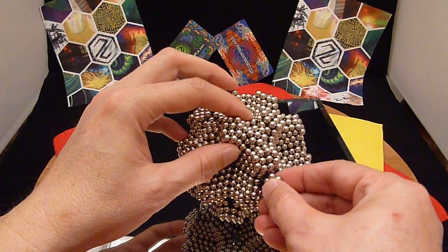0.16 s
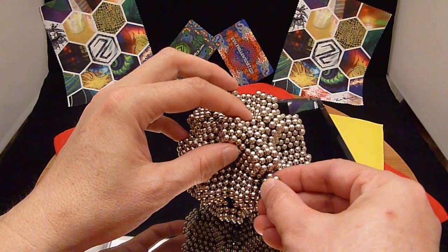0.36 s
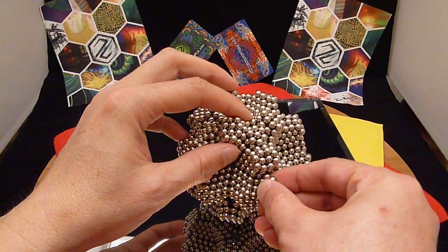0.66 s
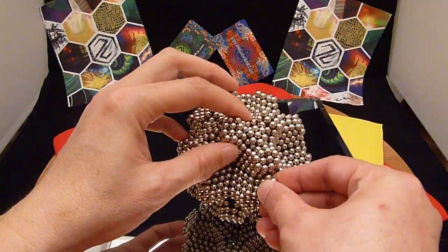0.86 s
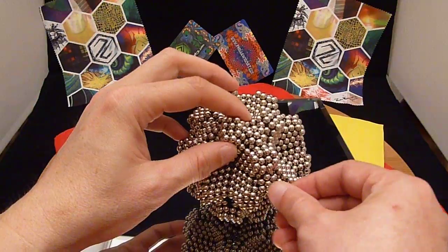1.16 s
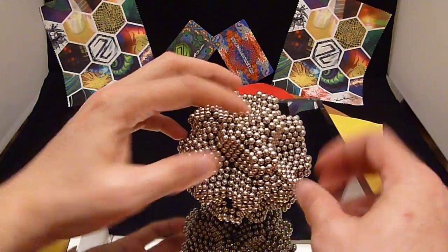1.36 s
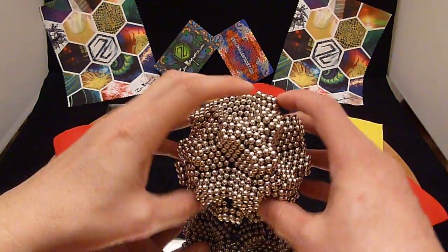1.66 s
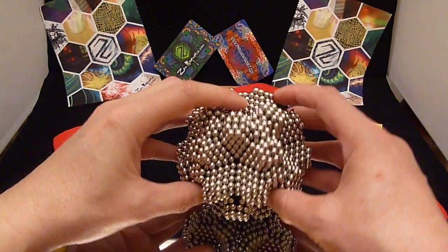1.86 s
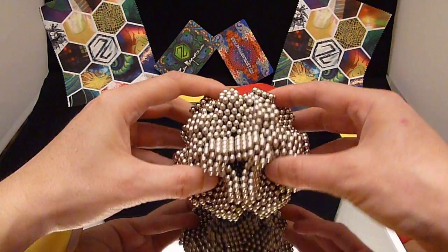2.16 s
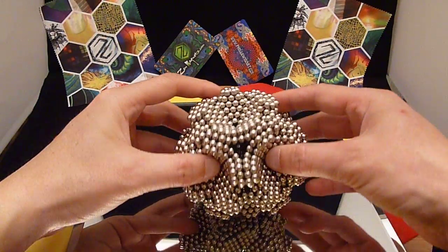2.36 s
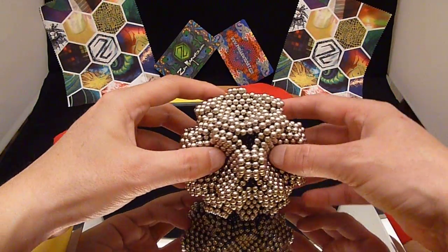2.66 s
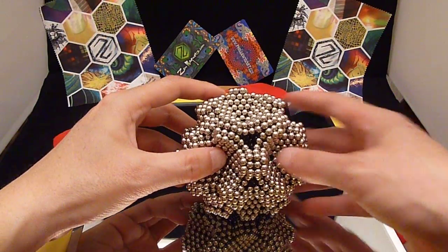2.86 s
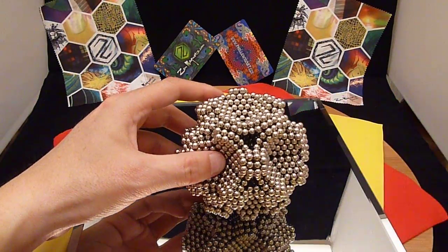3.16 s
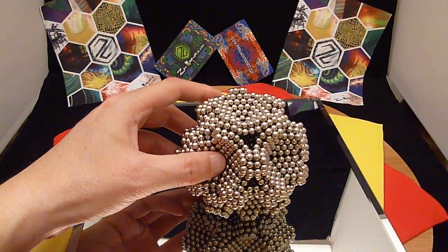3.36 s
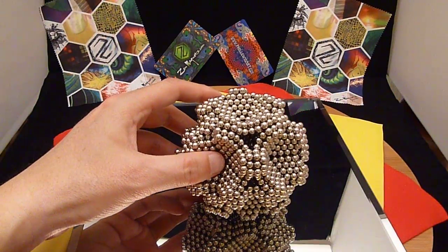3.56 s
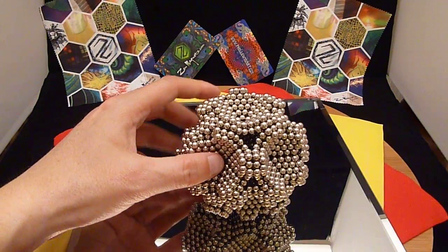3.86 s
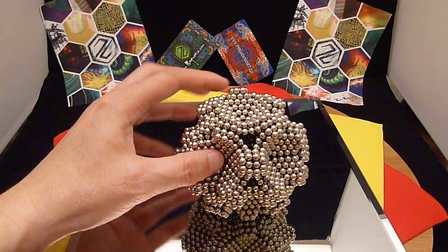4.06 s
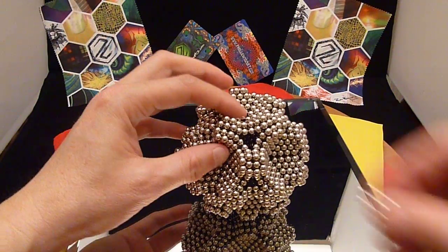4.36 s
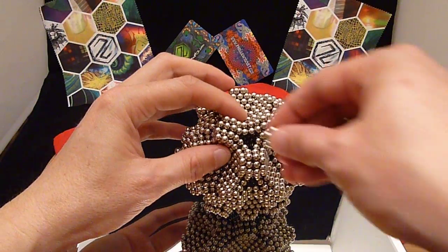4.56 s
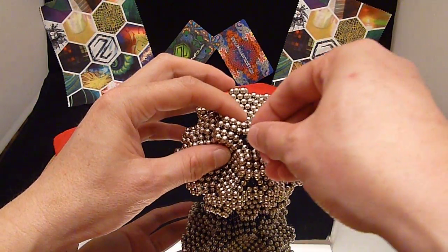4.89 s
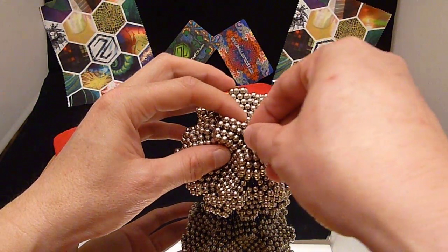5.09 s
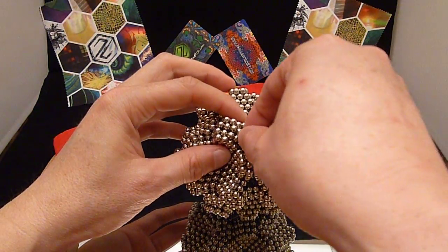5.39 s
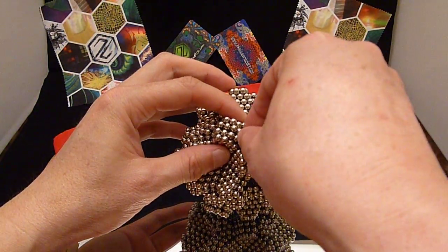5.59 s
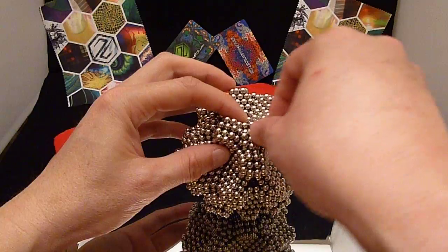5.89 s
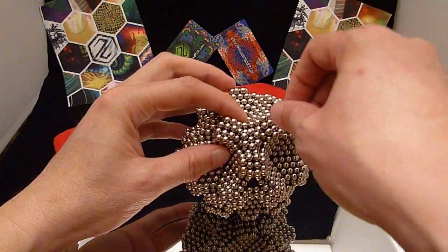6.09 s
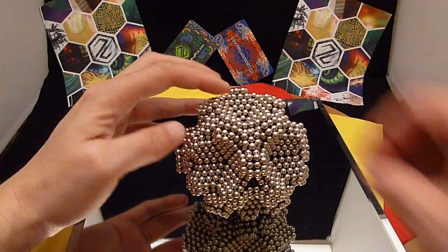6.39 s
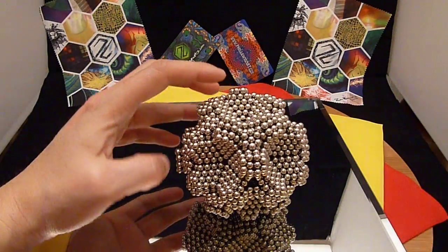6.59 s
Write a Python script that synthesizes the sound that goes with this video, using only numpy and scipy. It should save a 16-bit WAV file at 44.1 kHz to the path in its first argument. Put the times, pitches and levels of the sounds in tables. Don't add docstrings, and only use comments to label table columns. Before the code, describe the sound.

In a quiet room, hands turn a magnet-sphere ball on glass: crisp clicks, hard knocks, creaking table shudders, then sparse soft snaps over humming air.

```python
import sys
import numpy as np
from scipy import signal
from scipy.fft import rfft, irfft, next_fast_len
from scipy.io import wavfile
from scipy.ndimage import uniform_filter1d

SR = 44100
rng = np.random.default_rng(int(sys.argv[2]) if len(sys.argv) > 2 else 0)


def inscribe(sig):
    pcm = np.round(np.clip(np.atleast_2d(sig).T, -1, 1) * 32767)
    wavfile.write(sys.argv[1], SR, pcm.astype(np.int16))


def rack_gain(trim_db):
    fader = np.asarray(trim_db, float)
    return 10 ** (fader / 20)


N = 296881


def colour(x, points):
    hz, db = np.transpose(points)
    size = next_fast_len(len(x))
    log_hz = np.log(np.arange(size // 2 + 1) * SR / size + 1)
    gain = rack_gain(np.interp(log_hz, np.log(hz), db))
    return irfft(rfft(x, size) * gain, size)[:len(x)]


def level(x, db):
    return x * rack_gain(db) / np.sqrt(np.mean(x ** 2))


def lowpass(x, order, hz):
    return signal.sosfilt(signal.butter(order, hz, fs=SR, output="sos"), x)


def bandpass(x, low_hz, high_hz):
    return signal.sosfilt(signal.butter(2, [low_hz, high_hz], "band", fs=SR, output="sos"), x)


def walk(rate_hz):
    k = int(SR / rate_hz)
    steps = np.repeat(rng.standard_normal(N // k + 1), k)
    x = uniform_filter1d(uniform_filter1d(steps, k), k)[:N]
    return x / x.std()


def add(out, start_s, sound):
    i = int(start_s * SR)
    out[i:i + len(sound)] += sound[:len(out) - i]


def body(modes, scale=1):
    hz, db, t60_s = np.transpose(modes)
    t = np.arange(4000) / SR
    ringing = np.sin(2 * np.pi * np.outer(scale * hz, t)) * rack_gain(-60 * t / t60_s[:, None])
    return rack_gain(db) @ ringing


def air():
    # frequency in Hz, density in dB per Hz
    air_spectrum = [(25, -32.5), (60, -23), (95, -19.5), (118, -19.5), (150, -17), (240, -15), (300, -18.5),
                    (340, -20), (650, -24.5), (1270, -29), (1800, -32.5), (3500, -37.5), (6500, -40.5),
                    (9500, -42.5)]
    # frequency in Hz, level in dB rms
    hum_tone = (118.4, -65.5)
    # multiple of the base pitch, level in dB rms
    whine_partials = [(6, -84), (7, -80), (8, -86), (13, -90), (14, -84), (15, -83), (16, -89), (17, -89),
                      (18, -86), (19, -86)]
    whine_hz = 444.4
    t = np.arange(N) / SR

    noise = level(colour(rng.standard_normal(N), air_spectrum), -52)
    bass = lowpass(noise, 2, 400)
    noise = noise + bass * (rack_gain(1.4 * walk(2.39)) - 1)

    hum_hz, hum_db = hum_tone
    hum_phase = 2 * np.pi * np.cumsum(hum_hz + 9 * walk(14)) / SR
    hum = np.sin(hum_phase) * rack_gain(hum_db + 3 + 2.3 * walk(2.5))

    whine = sum(rack_gain(db + 3) * np.sin(2 * np.pi * k * whine_hz * t) for k, db in whine_partials)
    return noise + hum + whine


def slide():
    # frequency in Hz, width in Hz, level in dB
    low_modes = [(70, 50, 6), (130, 23, 16), (280, 120, -5.5)]
    # peak in seconds, half length in seconds, rumble in dB,
    # scrape in dB relative to the rumble
    strokes = [(2.198, .105, -44.5, -20), (2.927, .11, -50, 0), (3.06, .11, -55.5, -7),
               (3.205, .07, -43.5, 0.5), (3.403, .065, -50, -17), (3.7, .1, -50, -6), (3.82, .065, -46, -1),
               (3.95, 0.063, -57, -7), (4.41, 0.11, -57.5, 8), (4.54, .1, -58, 4), (4.66, .1, -55, 0)]
    t = np.arange(N) / SR
    rub = rng.standard_normal(N) * rack_gain(3 * walk(40))

    rumble = np.zeros(N)
    for hz, width_hz, db in low_modes:
        rumble += rack_gain(db) * signal.lfilter(*signal.iirpeak(hz, hz / width_hz, SR), rub)
    rumble = level(rumble, -10.5)
    scrape = level(colour(rub, [(250, -20.5), (600, 7.5), (1300, -7), (2500, -33)]), -8.5)

    out = np.zeros(N)
    for peak_s, half_s, db, scrape_db in strokes:
        pressure = np.clip(1 - np.abs(t - peak_s) / half_s, 0, 1)
        out += rack_gain(db) * pressure * (rumble + scrape * rack_gain(scrape_db))
    return out


def table():
    # start in seconds, peak in dB, pitch in Hz, length in cycles
    shudders = [(2.11, -44.5, 64.2, 4.6), (3.7, -46, 70, 7.6), (2.893, -38, 280, 7.6),
                (2.926, -35, 142, 4.1), (2.928, -29.5, 313, 3.7), (2.945, -28, 277, 3.9),
                (2.969, -35, 297, 3.6), (2.98, -36.5, 281.4, 7.6), (3.001, -39, 292, 7),
                (3.145, -39.5, 130, 2.9), (3.178, -40.5, 130, 5.5), (3.191, -35.5, 290, 1.6),
                (3.205, -45, 330, 5), (3.225, -39, 229, 3.4), (3.243, -54, 200, 4.8),
                (3.788, -45.5, 280, 5.3), (3.816, -41.5, 231, 3.1), (4.344, -46.5, 285, 4.4)]
    # start in seconds, peak in dB, pitch in Hz
    ticks = [(1.1215, -35, 780), (1.1217, -37, 570), (1.1221, -35, 1046), (1.1269, -37, 1000),
             (1.1225, -41.5, 1400), (1.12, -39.5, 230), (3.1, -50, 1360), (2.874, -46.5, 1240),
             (2.916, -47.5, 1260), (3.354, -43, 1160), (3.901, -49, 1610), (3.9207, -32.5, 300),
             (3.9205, -48, 755), (5.570, -44.5, 860), (5.882, -39.5, 1050), (5.881, -47, 1400),
             (6.663, -35, 300), (6.6634, -45, 590), (6.6635, -43, 880), (6.6637, -44.5, 1460)]
    out = np.zeros(N)
    for start_s, peak_db, hz, cycles in shudders:
        length_s = cycles / hz
        t = np.arange(int(length_s * SR)) / SR
        tone = np.sin(2 * np.pi * hz * t) + 0.17 * np.sin(2 * np.pi * 2.01 * hz * t)
        swell = np.sin(np.pi * (t / length_s) ** 1.33)
        add(out, start_s, rack_gain(peak_db) * tone * swell)

    t60_s = 0.034
    tick_modes = [(1, 3.5, t60_s), (1.3, -9, .5 * t60_s), (2.6, -14, 0.19 * t60_s)]  # (multiple, dB, s)
    for start_s, peak_db, hz in ticks:
        add(out, start_s, rack_gain(peak_db) * body(tick_modes, hz))
    return bandpass(out, 90, 3000)


def contacts():
    # start in seconds, glass peak in dB, shell and spheres
    # in dB relative to the glass, sphere ring in Hz
    knocks = [(.649, -46.5, 0, -5, 5500), (2.1084, -17.5, -.5, -8, 4640), (2.132, -27.5, -11, -10, 4800),
              (2.138, -29, -5, -20, 5400), (2.145, -37, -4, -15, 4840), (2.3304, -21.5, -4, -8, 4610),
              (2.467, -34, -4, -8.5, 4700), (2.5061, -17, -4.5, -9, 4330), (2.717, -21, -10, -3, 3690),
              (3.905, -47, -5, -2, 5000), (3.921, -43, 0, -5, 5340), (5.570, -49, -1, -9, 5780),
              (5.83, -34, -4.5, -18, 5700), (6.6636, -52, 7.5, 0.5, 3700)]
    # start in seconds, spheres peak in dB, shell and glass
    # in dB relative to the spheres, sphere ring in Hz
    snaps = [
        (1.1178, -29, -12, -9, 5930),
        (1.1213, -20.5, -24, -11.5, 5390),
        (2.7313, -46, -9, 6, 6000),
        (3.751, -46.5, -2, -10, 4350),
        (3.767, -54.5, 7, -3, 4500),
        (3.8996, -40.5, 4, -5, 4300),
        (5.5656, -34, -25, -15, 6000),
        (5.827, -39, -21, -9, 5700),
        (5.879, -31.5, -8, -16, 6100),
        (5.884, -36.5, -12, -8, 5300),
    ]
    rows = []
    for s, glass_db, shell_db, spheres_db, hz in knocks:
        rows.append((s, glass_db, -6, shell_db, spheres_db, hz))
    for s, db, shell_db, glass_db, hz in snaps:
        table_db = -7 + 15 * (s < 3.0)
        rows.append((s, db + glass_db, table_db, shell_db - glass_db, -glass_db, hz))
    return sorted(rows)


def clatter():
    # frequency in Hz, density in dB per Hz
    shell_spray = [(700, -19), (1400, 1), (3200, -0.5), (5000, -8), (7500, -17.5)]
    # frequency in Hz, density in dB per Hz
    sphere_spray = [(2500, -21), (4500, -3), (5500, -0.5), (6800, -3.5), (8000, -18.5)]
    t = np.arange(12000) / SR
    shift = rack_gain(-60 * t / 0.057)
    settle = rack_gain(-15 - 60 * t / 0.22)
    fade = (shift + settle) * (1 - np.exp(-t / 0.0017))

    shell, spheres = np.zeros(N), np.zeros(N)
    for s, glass_db, _, shell_db, spheres_db, _ in contacts():
        add(shell, s, rack_gain(glass_db + shell_db) * fade)
        add(spheres, s, rack_gain(glass_db + spheres_db) * fade)

    grains = rng.standard_normal(N) * rack_gain(4 * walk(700))
    shell = shell * level(colour(grains, shell_spray), -17.5)
    spheres = spheres * level(colour(grains, sphere_spray), -23)
    return shell + spheres


def rattle_of(lag, push):
    steps = np.clip(np.abs(lag) * 3.5 * SR / 1000, 0, 1199).astype(int)
    rattle = np.zeros(1200)
    np.add.at(rattle, steps, .5 * push * np.exp(-.6 * np.abs(lag)))
    rattle[0] += .6
    spread = rfft(rattle)
    return irfft(spread / (np.abs(spread) + .05) ** .6)[:600]


def hits(count=60):
    # mode in Hz, level in dB, decay t60 in seconds
    glass_modes = [(825, 3, 0.043), (952, 4.5, 0.029), (1054, 5.5, 0.045), (1356, 11, 0.027),
                   (1470, -15, 0.011), (1680, -4.5, 0.014), (1824, -8.5, 0.014)]
    # mode in Hz, level in dB, decay t60 in seconds
    table_modes = [(200, -7.5, 0.038), (330, -3.5, 0.035), (476, 4, 0.23), (572.7, -2.5, 0.079),
                   (648, 2, 0.067)]
    # mode in Hz, level in dB, decay t60 in seconds
    shell_modes = [(2200, -3.4, 0.0036), (2410, -2.5, 0.0095), (2986, 1, 0.0087), (3570, 1, 0.0069),
                   (3990, -1.5, .006)]
    # multiple of the ring pitch, level in dB, decay t60 in seconds
    sphere_modes = [(1, 6, 0.0062), (.9, -8.5, 0.0046), (1.13, 1, 0.0037), (1.28, 3, 0.0035),
                    (1.45, -11, 0.0085)]
    # echo delay in milliseconds, level in dB
    panel_echoes = [(1.3, -14), (1.95, 1.5), (3.05, 0.5), (4.1, -13), (5.3, -3.5), (6.9, -12.5),
                    (9.0, -10.5), (10.6, -13.5)]
    glass, table_top, shell = body(glass_modes), body(table_modes), body(shell_modes)
    knock, snap = np.zeros(N), np.zeros(N)
    events = contacts()
    chance = rng.standard_normal((len(events), 2, count))
    for (s, glass_db, table_db, shell_db, spheres_db, ring_hz), (lag, push) in zip(events, chance):
        rattle = rattle_of(lag, push)
        rattled_shell = np.convolve(rattle, shell)
        rattled_spheres = np.convolve(rattle, body(sphere_modes, ring_hz))
        parts = [(knock, glass, 0), (knock, table_top, table_db),
                 (snap, rattled_shell, shell_db + 3.5), (snap, rattled_spheres, spheres_db + 5.5)]
        for out, part, rel_db in parts:
            add(out, s - .0001, rack_gain(glass_db + rel_db - 3.5) * part / np.abs(part).max())

    echoes = sum(rack_gain(db) * np.roll(knock, int(ms * SR / 1000)) for ms, db in panel_echoes)
    return bandpass(knock + echoes + snap, 200, 6800)


def room(x, size=16000):
    t = np.arange(size) / SR
    echoes = rng.standard_normal(size) * (1 - np.exp(-np.clip(t - .002, 0, 1) / 0.0009))
    bass = lowpass(echoes, 1, 2000)
    treble = echoes - bass
    tail = bass * rack_gain(-60 * t / 0.37) + treble * rack_gain(-3 - 60 * t / 0.34)

    spectrum = rfft(tail)
    power = np.abs(spectrum) ** 2
    even = np.sqrt(uniform_filter1d(power, size=400) / uniform_filter1d(power, size=30))
    tail = irfft(spectrum * even)[:-1500]
    return x + rack_gain(-11) * signal.fftconvolve(x, tail / np.linalg.norm(tail))[:N]


def scene():
    in_room = room(hits() + table() + slide())
    return (in_room + air() + clatter())[None]


def top_cut(x):
    return signal.sosfilt(signal.butter(12, 8920, fs=SR, output="sos"), x)


def record(dry):
    soft = lowpass(dry, 14, 7700)
    return top_cut(soft + .013)


dry = scene()
out = record(dry)
inscribe(out)
```